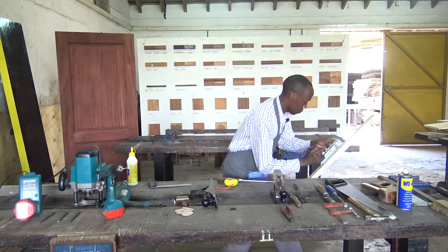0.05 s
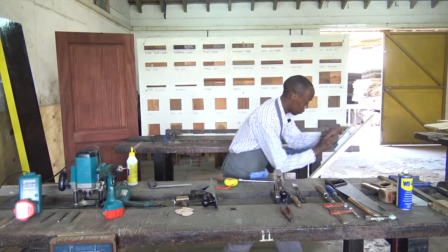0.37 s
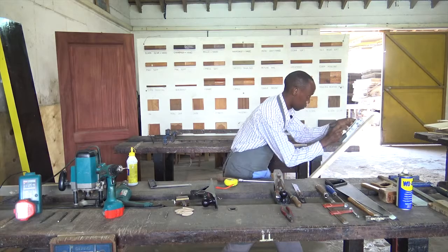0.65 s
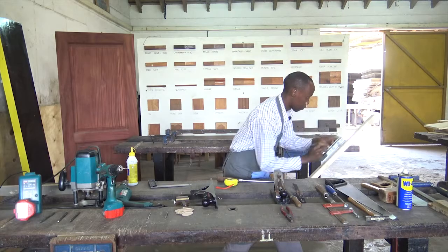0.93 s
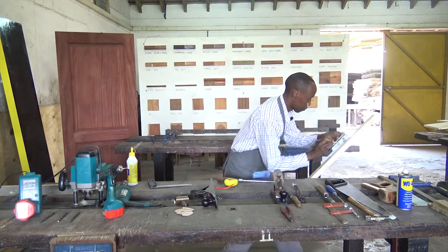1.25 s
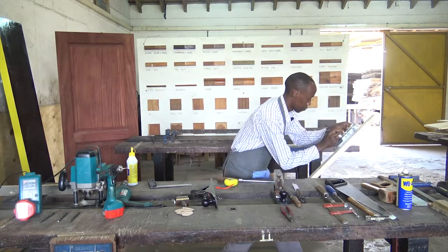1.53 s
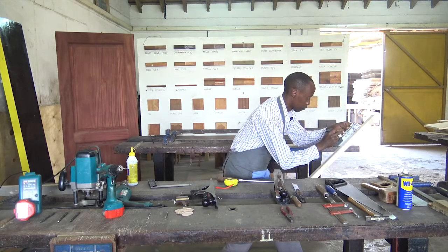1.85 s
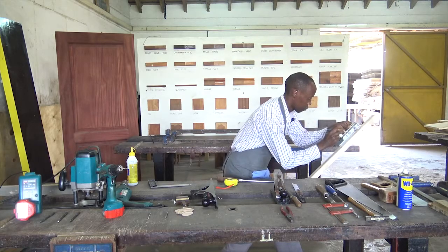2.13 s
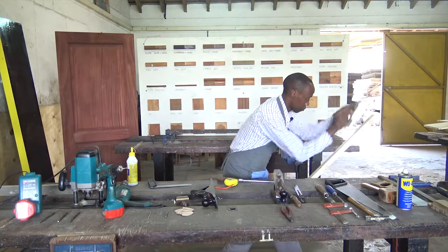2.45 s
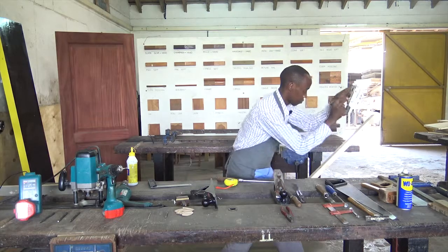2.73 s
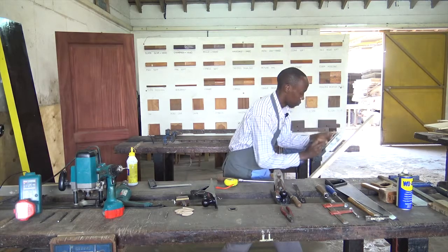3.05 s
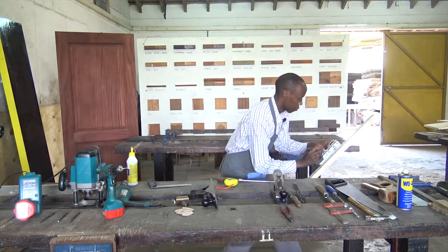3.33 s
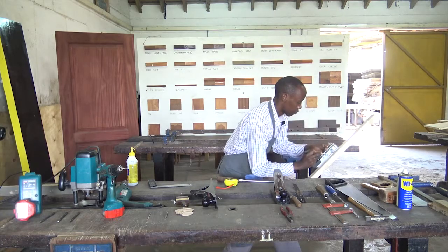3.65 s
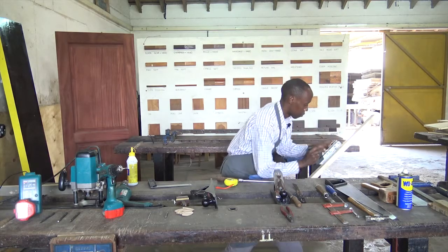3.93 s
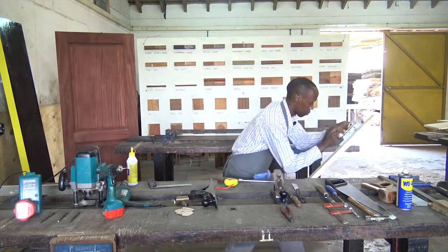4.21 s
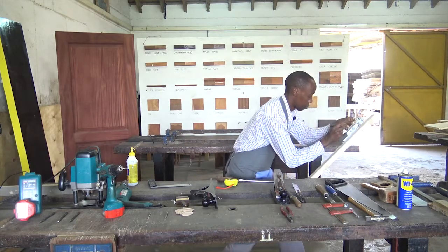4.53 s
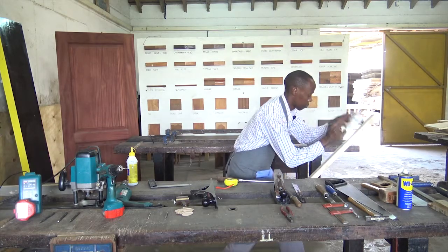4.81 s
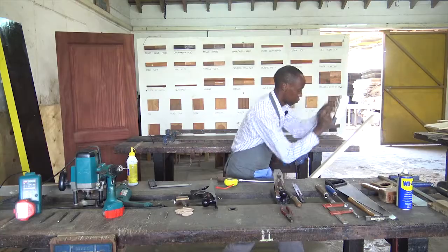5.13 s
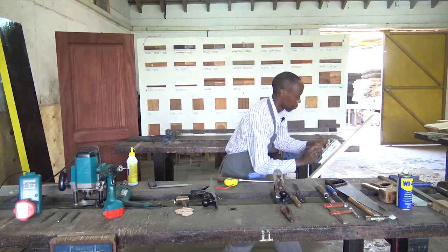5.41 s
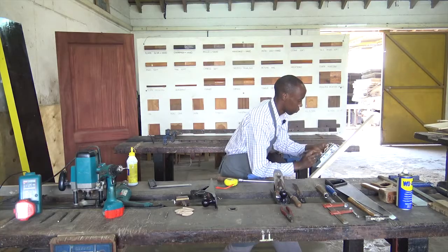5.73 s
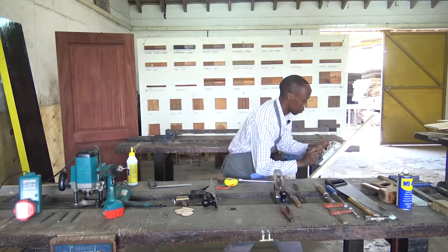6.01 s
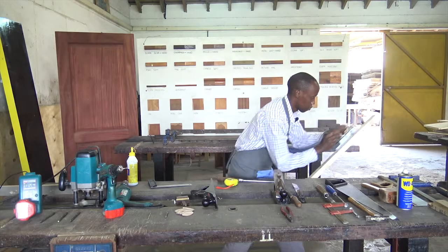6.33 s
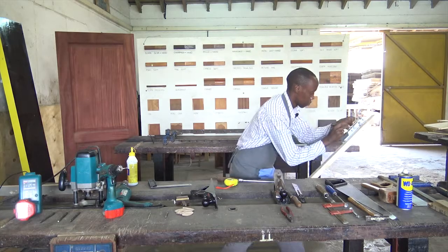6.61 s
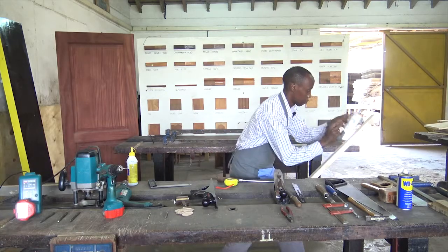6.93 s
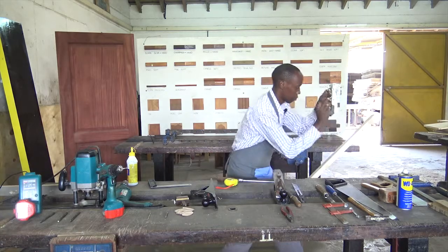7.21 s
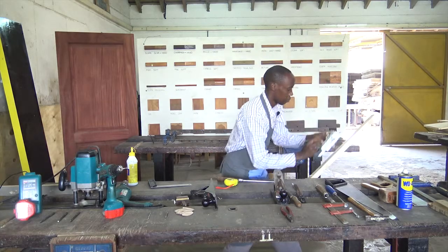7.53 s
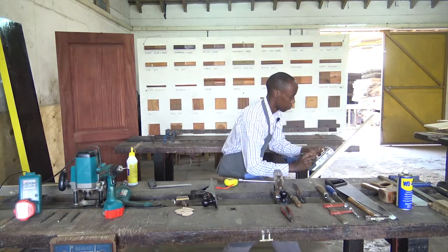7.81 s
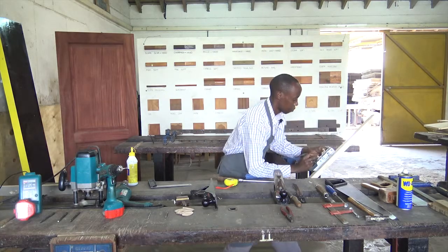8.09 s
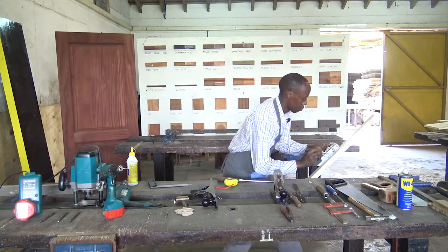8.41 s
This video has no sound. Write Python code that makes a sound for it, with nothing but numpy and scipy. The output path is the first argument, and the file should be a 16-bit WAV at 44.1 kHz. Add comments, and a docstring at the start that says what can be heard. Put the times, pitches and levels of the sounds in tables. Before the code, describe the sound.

Uneven rasping strokes of a plane on a board, with crackling fibres, small metal clinks and low clothing rustle in a workshop.

```python
"""First comes a soft rumble of cloth, then a plow plane slides and jabs at a board in a workshop.
It cuts a groove in three rasping cuts and two shallow jabs, with light slides between. Fibres tear
and snap at the blade, the steel and the board ring, and now and then the plane clinks or knocks on
the wood. The rumble is the worker's shirt moving a clip-on microphone with every push and reach."""
import sys
import numpy as np
from scipy import signal
from scipy.fft import rfft, irfft, next_fast_len
from scipy.io import wavfile
from scipy.ndimage import map_coordinates

SR = 44100
rng = np.random.default_rng(int(sys.argv[2]) if len(sys.argv) > 2 else 0)


def wav_out(sig):
    """Save sig, one row per channel (or a flat mono array), as 16-bit PCM at SR to the path in sys.argv[1]."""
    wavfile.write(sys.argv[1], SR, np.round(np.clip(np.atleast_2d(sig).T, -1, 1) * 32767).astype(np.int16))


N = 372818
TOP_HZ = 15950  # the highest pitch kept


def amp(db):
    """Turn decibels into a gain to multiply by."""
    return 10 ** (np.asarray(db) / 20)


def unit(x):
    """Scale a sound so that its average strength (rms) is 1."""
    return x / np.sqrt(np.mean(x ** 2) + 1e-20)


def along(points, hz):
    """Read between (pitch_hz, value) points on a log pitch scale."""
    pitches, values = np.transpose(points)
    return np.interp(np.log(hz + 1), np.log(pitches + 1), values)


def wobble(rate):
    """A smooth random curve through `rate` random values a second."""
    return map_coordinates(rng.standard_normal(int(N * rate / SR) + 4), [np.arange(N) * rate / SR])


def add(track, start_s, sound):
    """Mix a sound into the track at start_s."""
    part = track[max(0, round(start_s * SR)):][:len(sound)]
    part += sound[:len(part)]


def arch(start, length, power):
    """A move that speeds up and slows down: half a sine wave, narrower at a higher power."""
    phase = (np.arange(N) / SR - start) / length
    out, inside = np.zeros(N), (phase > 0) & (phase < 1)
    out[inside] = np.sin(np.pi * phase[inside]) ** power
    return out


def tiny_clicks(rate, spread_db, clump_db, clump_rate):
    """About `rate` clicks a second, uneven in size, in louder and softer clumps."""
    happens = rng.random(N) < rate / SR
    sizes = rng.choice([-1, 1], N) * amp(spread_db * np.clip(rng.standard_normal(N), -2, 2))
    return unit(happens * sizes * amp(clump_db * wobble(clump_rate)))


# Resonances, the pitches at which board and plane like to ring: pitch_hz, width_hz, lift_db
RESONANCES = [(266.3, 36, 9), (393.4, 22, 7.5), (610, 50, 3), (727, 34, 6), (975, 220, 8), (1271, 127, 7.5),
              (1467, 200, 8.5), (1680, 150, 6.5), (2420, 90, 6), (2990, 530, 3), (3366, 140, 3.5),
              (4360, 190, 4), (4850, 240, 3.5), (6100, 250, 4.5), (6900, 380, 3.5), (7780, 1200, 2.5),
              (9800, 320, 4.5), (10500, 220, 1.5), (12500, 600, 1)]

def response(spectrum, ring):
    """A filter shaped like the spectrum, plus the resonances with their lift scaled by `ring`."""
    hz = np.fft.rfftfreq(32768, 1 / SR)
    peaks_db = sum(lift / (1 + (2 * (hz - pitch) / width) ** 2) for pitch, width, lift in RESONANCES)
    cepstrum = irfft(np.log(amp(along(spectrum, hz) + ring * peaks_db)))
    # Fold it so that the ringing comes after a hit, never before.
    cepstrum[1:len(hz) - 1] *= 2
    cepstrum[len(hz):] = 0
    return irfft(np.exp(rfft(cepstrum)))


def coloured(x, spectrum, ring=0):
    """Give a sound the tone of a spectrum, at strength 1: only the spectrum's shape counts."""
    return unit(signal.fftconvolve(x, response(spectrum, ring))[:len(x)])


def travelling(x, depth_db, rate):
    """As the plane moves along the board, each resonance is shaken now more, now less."""
    hz, t, spectra = signal.stft(x, SR, nperseg=1024)
    swell = 0
    for pitch, width, _ in RESONANCES:
        drive = map_coordinates(rng.standard_normal(len(t)), [t * rate], mode="mirror")
        swell = swell + np.outer(1 / (1 + (2 * (hz - pitch) / width) ** 2), np.tanh(drive))
    return unit(signal.istft(spectra * amp(depth_db * swell), SR, nperseg=1024)[1][:N])


def strike(notes, t, noise_db, noise_fade_s, tilt_db=0):
    """One blow of peak 1: ringing notes and a burst of noise. A fade is the time to drop 60 dB."""
    hz, db, fade_s = np.transpose(notes)[:, :, None]
    level_db = db + tilt_db * np.log2(hz / hz[0]) + rng.normal(0, 0.31, hz.shape)
    ring = np.sum(amp(level_db - 60 * t / fade_s) * np.sin(2 * np.pi * hz * t), axis=0)
    band = signal.butter(2, [hz.min(), hz.max()], "band", fs=SR, output="sos")
    contact = unit(signal.sosfilt(band, rng.standard_normal(len(t))))
    blow = ring / np.abs(ring).max() + contact * amp(noise_db - 60 * t / noise_fade_s)
    return blow / np.abs(blow).max()


# The tone of the workshop's air: pitch_hz, level_db
AIR_TONE = [(59, -16.5), (100, -10), (334, -16.5), (372, -18.5), (460, -18.5), (631, -21), (1240, -23),
            (1780, -28.5), (2110, -29.5), (3230, -31.5), (4250, -32), (15800, -42)]

def air():
    """A faint, low hush that wavers a little."""
    return amp(-45.5 + 1.1 * wobble(10)) * coloured(rng.standard_normal(N), AIR_TONE)


# How long the room's echo lasts: pitch_hz, fade_s
ECHO_FADES = [(150, 0.81), (1000, 0.88), (4000, 0.61), (8000, 0.26), (15000, 0.17)]

def room_echo(x):
    """The room answers with a blur of echoes in which the high pitches die first."""
    hz, t, spectra = signal.stft(rng.standard_normal(SR // 2), SR, nperseg=256)
    tail = signal.istft(spectra * amp(-60 * t / along(ECHO_FADES, hz)[:, None]), SR, nperseg=256)[1]
    return signal.fftconvolve(np.pad(x, (300, 0)), tail / np.linalg.norm(tail))[:N]


# The arm reaching out to clear the shaving: start_s, length_s, rustle_db, microphone_rub_db
REACHES = [(2.6, .5, -54, -34), (4.8, 0.73, -58.5, -36.5), (6.85, 1.0, -54.5, -40)]
REACH_POWER = 0.75  # loudness is the arm's speed to this power
# The low and high parts of light brushing, by sleeve or plane: pitch_hz, level_db
BRUSH_LOW = [(100, -28), (220, 2.5), (520, 2), (750, -3), (1400, -4.5), (2200, -0.5), (5000, -54.5)]
BRUSH_HIGH = [(600, -10.5), (1300, 13.5), (2200, 13.5), (3100, 10.5), (4500, 10.5), (5500, 8), (6900, 10.5),
              (8500, 1), (11000, -8), (15500, -29)]

def sleeve():
    """The sleeve rustles softly while the arm reaches out."""
    level = sum(amp(db) * arch(start, length, REACH_POWER) for start, length, db, _ in REACHES)
    grains = tiny_clicks(rate=9000, spread_db=8, clump_db=0.5, clump_rate=22)
    return level * (coloured(grains, BRUSH_HIGH) + amp(1.5) * coloured(grains, BRUSH_LOW))


# The worker leaning: middle_s, length_s, level_db
LEANS = [(0.0, 0.18, -17), (0.472, 0.33, -14.5), (0.855, 0.51, -23.5), (1.244, 0.16, -14),
         (1.586, 0.52, -15.5), (2.283, 0.67, -16.5), (2.576, 0.25, -14.5), (2.907, 0.62, -23.5),
         (3.88, 0.16, -24.5), (4.228, 0.55, -12), (5.208, .35, -33), (6.445, 0.73, -12.5)]
# Tugs and bumps on the microphone cable: start_s, level_db, pitch_hz, length_s
CABLE_TUGS = [(.41, -28, 190.5, 0.033), (.433, -20, 150, 0.013), (0.64, -14, 78.5, 0.037),
              (2.519, -13.5, 58.6, 0.036), (2.748, -20.5, 83.6, 0.046), (2.933, -11, 35, 0.073),
              (3.022, -17.5, 61.5, 0.061), (4.809, -10, 22.5, 0.11), (5.27, -16.5, 40, 0.06)]
# The tones of cloth swaying and of cloth rubbing: pitch_hz, level_db
SWAY_TONE = [(5, -9.5), (14, -1), (24, 4.5), (34, -4), (50, -8.5), (70, -26.5), (110, -35.5), (250, -84)]
RUB_TONE = [(35, -21), (70, 4.5), (100, -5.5), (160, -11.5), (260, -18), (600, -54.5)]

def shirt():
    """Cloth sways and rubs the microphone as the worker moves; a tug on the cable is a soft thump."""
    lean = sum(amp(db) * arch(middle - length / 2, length, power=1.43) for middle, length, db in LEANS)
    reach = sum(amp(db) * arch(start, length, REACH_POWER) for start, length, _, db in REACHES)
    sway = np.hypot(amp(-32), lean)  # sway and rub go on faintly between pushes
    rub = np.hypot(amp(-42), reach + amp(-25.5) * lean ** 0.64)
    swing = signal.hilbert(coloured(rng.standard_normal(N), SWAY_TONE))
    swing = unit(swing.real / np.sqrt(np.abs(swing) ** 2 + 0.72))  # tight cloth limits the swing
    out = sway * swing + rub * amp(0.86 * wobble(13)) * coloured(rng.standard_normal(N), RUB_TONE)
    for start, db, hz, length in CABLE_TUGS:
        t = np.arange(int(length * SR)) / SR
        add(out, start, amp(db) * np.hanning(len(t)) * np.sin(2 * np.pi * hz * t))
    return out


# The plane bumping the board: start_s, level_db, brightness_db_per_octave, rise_s
KNOCKS = [(.298, -16, -1, 0.0018), (.41, -23, 0, .003), (1.177, -17, -1, .001), (1.233, -15, 12, 0.0028),
          (1.478, -12, 4, 0.00075), (2.5411, -18, 10, 0.00036), (3.299, -13.5, -7, 0.0044),
          (3.335, -14, -9, 0.011), (4.797, -20, 11, 0.0011), (5.525, -11.5, -4, 0.0094),
          (5.614, -7.5, -1.5, 0.0035), (6.55, -20, 11, .002), (6.882, -21, 12.5, 0.00069),
          (7.8371, -6, 3, 0.0014), (7.855, -13.5, -7, 0.002)]
# The notes of the struck board: pitch_hz, level_db, fade_s
WOOD_NOTES = [(220, -1.5, 0.09), (311, -1.5, 0.1), (344, 3.5, 0.042), (401, 12.5, 0.045), (468.4, 0, 0.17),
              (545, 5, 0.045), (662, -1.5, 0.052), (817, -17, 0.23), (1006, -14, 0.15), (1250, -52, 0.072),
              (1420, -33, 0.033)]

def knocks():
    """Bumps ring the board. Hard ones are brighter; cushioned ones rise slowly and lose some peak."""
    out, t = np.zeros(N), np.arange(SR // 3) / SR
    for start, db, brightness, rise in KNOCKS:
        blow = strike(WOOD_NOTES, t, noise_db=-34.5, noise_fade_s=0.15, tilt_db=brightness)
        add(out, start, amp(db) * blow * (1 - np.exp(-t / rise)))
    return out


# Jolts as the plane catches or is lifted: start_s, peak_db
CLINKS = [(1.473, -20.5), (1.526, -29), (2.358, -19), (2.378, -21), (2.394, -23), (6.545, -25),
          (6.896, -31.5), (6.923, -28)]
# The notes of the fence (the plane's side guide) and its rods: pitch_hz, level_db, fade_s
FENCE_NOTES = [(1736, -1, 0.044), (2424, 0, 0.066), (2570, 3, 0.092), (3090, 1, 0.046), (3720, -1, .1),
               (4230, 0.5, 0.064), (6900, -3, .06), (10600, -17, .1)]

def clinks():
    """The fence and its rods ring briefly when the plane is jolted."""
    out, t = np.zeros(N), np.arange(SR // 4) / SR
    for start, db in CLINKS:
        add(out, start, amp(db) * strike(FENCE_NOTES, t, noise_db=-17.5, noise_fade_s=.07))
    return out


# The loose blade hitting the plane's body: start_s, peak_db
CLACKS = [(4.793, 0)]
# The notes of the struck steel: pitch_hz, level_db, fade_s
STEEL_NOTES = [(2620, -29, 0.06), (3360, -9, 0.02), (3838, -26, 0.09), (3970, -15, 0.022),
               (5922, -33, 0.0065), (6900, 3, 0.0033), (7500, -14, 0.0078), (7960, -5, 0.0082),
               (10100, -23, .009)]
# The tone laid over those notes: pitch_hz, level_db
CLACK_TONE = [(300, -4), (900, -7.5), (2100, -15), (2700, -1), (7800, 5), (9000, -15), (10300, 2),
              (12000, -24), (15500, -13)]

def clacks():
    """Steel hits steel, very briefly because the hands stop the ringing."""
    out, t = np.zeros(N), np.arange(SR // 4) / SR
    for start, db in CLACKS:
        clack = coloured(strike(STEEL_NOTES, t, noise_db=-18.5, noise_fade_s=0.02), CLACK_TONE)
        add(out, start, amp(db) * clack / np.abs(clack).max())
    return out


# Light slides in the groove: start_s, length_s, board_db, hiss_db, ring_hz, ring_db
SLIDES = [(0.199, 0.42, -41, -41.5, 3160, -57), (0.635, 0.42, -48, -41, 2800, -56),
          (1.081, 0.16, -58, -45.5, 2960, -58), (2.036, 0.069, -61, -47.5, 6600, -46.5),
          (2.165, 0.088, -39, -41, 6500, -44), (3.485, 0.27, -62, -57, 2970, -61),
          (3.761, 0.077, -43, -42.5, 6900, -54), (5.76, .36, -46.5, -49.5, 4300, -63),
          (6.016, 0.43, -41, -42, 4300, -57.5), (6.878, .03, -41, -42, 3720, -50),
          (6.918, .03, -45, -43, 3760, -45), (8.084, 0.27, -41, -41, 6600, -48),
          (8.359, .14, -46.5, -47, 6760, -56)]

def sliding():
    """The plane's steel runner brushes the groove, louder with speed, with one thin ring a move."""
    board, hiss, ring = np.zeros((3, N))
    grains = tiny_clicks(rate=14000, spread_db=8.0, clump_db=2.05, clump_rate=73)
    brush = travelling(grains, depth_db=2, rate=9)
    for start, length, board_db, hiss_db, ring_hz, ring_db in SLIDES:
        move = arch(start, length, power=0.79)
        board += amp(board_db) * move
        hiss += amp(hiss_db) * move
        ring += amp(ring_db) * move * unit(signal.lfilter(*signal.iirpeak(ring_hz, Q=8.5, fs=SR), grains))
    low = board * coloured(brush, BRUSH_LOW, ring=0.48)
    high = hiss * coloured(brush, BRUSH_HIGH, ring=0.35)
    return low + high + ring


# Short squeaks of steel or board: start_s, length_s, pitch_hz, width_hz, level_db
SQUEAKS = [(.26, .19, 540, 100, -44), (0.434, 0.033, 3180, 400, -37), (1.171, 0.035, 590, 210, -29.5),
           (1.193, .02, 12800, 2100, -40), (1.376, 0.23, 2410, 150, -46), (1.565, 0.042, 7060, 1500, -41),
           (2.349, .018, 1700, 410, -41), (2.424, 0.11, 416, 71, -36.5), (3.907, 0.14, 4250, 900, -35),
           (4.205, 0.01, 8950, 720, -31.5), (4.209, .035, 1600, 360, -31.5), (4.96, 0.26, 1110, 14, -58.5),
           (6.27, 0.03, 1750, 290, -34), (6.542, 0.043, 1730, 330, -37), (6.919, 0.11, 432, 12, -45.5)]

def squeaks():
    """The plane sticks and slips at one resonance for a moment; the slips make the squeak rough."""
    out = np.zeros(N)
    slips = amp(3.5 * wobble(240))
    for start, length, hz, width_hz, db in SQUEAKS:
        band = signal.butter(2, [hz - width_hz / 2, hz + width_hz / 2], "band", fs=SR, output="sos")
        n = int(length * SR)
        ring = signal.sosfilt(band, rng.standard_normal(SR))[-n:] * slips[int(start * SR):][:n]
        add(out, start, amp(db) * signal.windows.tukey(n, .6) * unit(ring))
    return out


# Patches of rough grain: start_s, length_s, level_db
ROUGH_PATCHES = [(1.332, .14, -20), (2.367, .035, -17), (3.931, .13, -23), (4.126, .11, -18.5),
                 (4.317, .055, -16.5), (6.42, .07, -31)]

def rough_grain():
    """On rough grain the shaving breaks in a quick, uneven run. Returns rows for snaps() to play."""
    rows = []
    gap_s, scatter_db, pitch_hz, clack_db = 0.0081, 2, 6900, -3.5
    for start, length, db in ROUGH_PATCHES:
        gap_dice, level_dice, pitch_dice = rng.standard_normal((3, 64))
        gaps = gap_s * np.exp(.35 * gap_dice)
        levels = db + scatter_db * np.tanh(level_dice)
        pitches = pitch_hz * np.exp(0.066 * pitch_dice)
        for delay, level, pitch in zip(np.cumsum(gaps) - gaps[0], levels, pitches):
            if delay < length:
                rows.append((start + delay, level, pitch, clack_db))
    return rows


# Single splinters, and ticks of the handled tool: start_s, level_db, pitch_hz, relative_clack_db
SINGLE_SNAPS = [(1.1767, -14, 3600, -21), (1.3993, -19, 6600, -3), (1.4748, -4.5, 5960, -7),
                (1.495, -5, 5700, -5), (1.514, -9.5, 6830, -10), (1.527, -7.5, 6300, -5),
                (2.358, -4, 6500, -4.5), (2.376, -6, 6860, -10), (2.5405, -24.5, 2000, -4),
                (3.6754, -25, 2820, -25), (3.8866, -26, 6820, -12), (4.3284, -13, 7220, -18),
                (5.089, -31, 2700, -6), (5.2824, -30.5, 3880, -6), (5.371, -30.5, 4200, -10),
                (6.5538, -19.5, 2510, -7), (6.8977, -20, 6750, -19), (7.5044, -24, 4310, -6),
                (7.681, -26.5, 5200, -18), (8.3254, -22, 4400, -16)]
# The tone the plane's body gives to a crack: pitch_hz, level_db
PLANE_TONE = [(300, -21), (1200, -34.5), (1700, -5), (4400, 3), (5200, 3), (6500, 8), (9000, 0.5),
              (12000, -3), (15500, 0)]

def snaps(rows):
    """Each splinter gives a tiny crack at its own pitch and a clack, both ringing through the plane."""
    out, t = np.zeros(N), np.arange(SR // 20) / SR
    body = response(PLANE_TONE, ring=1.5)[:len(t)]
    clack_band = signal.butter(2, [1400, 4600], "band", fs=SR, output="sos")
    noises = rng.standard_normal((128, len(t)))
    for (start, db, pitch_hz, clack_db), noise in zip(rows, noises):
        burst = noise * (amp(-60 * t / 0.013) + amp(-48 - 60 * t / 0.03))
        crack = unit(signal.lfilter(*signal.iirpeak(min(pitch_hz, TOP_HZ), Q=1.8, fs=SR), burst))
        clack = amp(clack_db + 3.5) * unit(signal.sosfilt(clack_band, burst))
        snap = signal.fftconvolve(crack + clack, body)[:len(t)]
        add(out, start, amp(db - 5) * snap / np.abs(snap).max())
    return out


# The cuts and jabs (a negative dip is a swell):
# start_s, rise_s, hold_s, fall_s, board_db, rasp_db, fizz_db, midway_dip_db
CUTS = [(0.257, .02, 0.17, .02, -39.5, -50, -62, 2.5), (1.166, .012, 0.34, 0.15, -33, -33.5, -47.5, 3),
        (2.343, 0.014, 0.18, 0.034, -38, -40.5, -57, 1.5), (3.869, 0.12, .27, .17, -29, -29.5, -44.5, -3.5),
        (6.2, .075, .21, 0.023, -26, -28, -43, 0.5)]

def strokes():
    """Loudness curves for board, rasp and fizz: the blade bites in, holds, and runs out of the wood."""
    board, rasp, fizz = np.zeros((3, N))
    t = np.arange(SR) / SR
    for start, rise, hold, fall, board_db, rasp_db, fizz_db, dip_db in CUTS:
        bite = np.interp(t, np.cumsum([0, rise, hold, fall]), [0, 1, 1, 0])
        push = amp(-dip_db * np.sin(np.pi * np.clip((t - rise) / hold, 0, 1)) ** 2)
        # A low rumble lingers and dies away after each cut.
        linger = (t > rise + hold) * amp(-9.5 - 50 * np.abs(t - rise - hold))
        # The push tires, so the three layers sink by 2, 16 and 18 dB a second.
        add(board, start, amp(board_db - 2 * t) * np.maximum(push * bite ** 1.5, linger))
        add(rasp, start, amp(rasp_db - 16 * t) * push * bite ** 0.94)
        add(fizz, start, amp(fizz_db - 18 * t) * push * bite ** 0.69)
    return board, rasp, fizz


# The tones of the grumbling board, the rasping steel and the fizzing shaving: pitch_hz, level_db
BOARD_TONE = [(90, -36.5), (170, 8.5), (265, 1.5), (330, 5), (500, 1), (900, -6.5), (1600, -13),
              (2100, -11.5), (3500, -21.5), (8000, -61.5)]
RASP_TONE = [(900, -57), (1800, -1.5), (2500, 0), (4000, 3), (5300, 2), (7000, 2), (8300, -1.5),
             (9500, -20), (14000, -37)]
FIZZ_TONE = [(5000, -26), (8000, -13), (10000, 7), (12000, 7), (15500, -5)]

def cutting():
    """Fibres tear at the blade and shake the board and the steel; the curling shaving crackles."""
    board, rasp, fizz = strokes()
    tear = tiny_clicks(rate=3000, spread_db=4.5, clump_db=1.5, clump_rate=290)
    drag = travelling(tear + .3 * rng.standard_normal(N), depth_db=6.5, rate=22)
    crackle = tiny_clicks(rate=260, spread_db=1.5, clump_db=2.5, clump_rate=40)
    wood = board * coloured(drag, BOARD_TONE, ring=0.97)
    steel = rasp * coloured(drag + 0.35 * crackle, RASP_TONE, ring=1.25)
    shaving = fizz * coloured(0.78 * drag + crackle, FIZZ_TONE, ring=1.05)
    return wood + steel + shaving


def scene():
    """Everything reaches one close microphone, the same on both channels."""
    rubbing = cutting() + sliding() + squeaks() + sleeve()
    cracks = snaps(SINGLE_SNAPS) + snaps(rough_grain()) + clacks() + clinks()
    bumps = knocks()
    echo = room_echo(amp(-14.5) * rubbing + amp(-18.5) * cracks + amp(-16.5) * bumps)
    return np.tile(rubbing + cracks + bumps + echo + air() + shirt(), (2, 1))


# The tone of a very faint hiss and low hush: pitch_hz, level_db
HISS_TONE = [(12, -25), (20, -7), (107, -21.5), (240, -20), (365, -28), (524, -29), (1180, -44),
             (1320, -51), (1950, -48.5), (8550, -25), (15800, -22.5)]

def record(dry):
    """Add a very faint hiss and low hush, opposite in left and right; keep nothing above TOP_HZ."""
    hiss = amp(-65.5) * coloured(rng.standard_normal(N), HISS_TONE)
    size = next_fast_len(N + SR // 2)
    kept = np.fft.rfftfreq(size, 1 / SR) < TOP_HZ
    spectrum = rfft(dry + np.array([hiss, -hiss]), size)
    return irfft(spectrum * kept, size)[:, :N]


dry = scene()
out = record(dry)
wav_out(out)
```